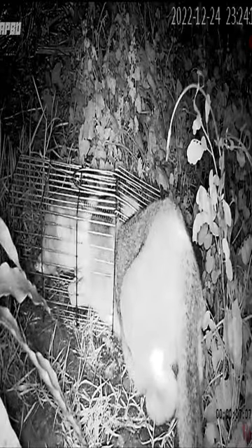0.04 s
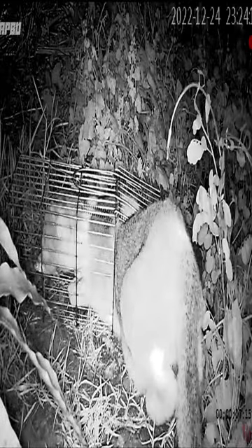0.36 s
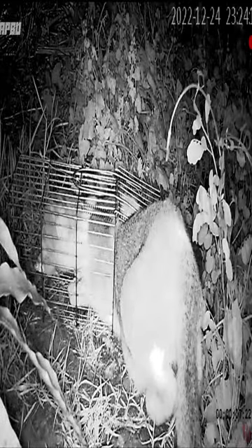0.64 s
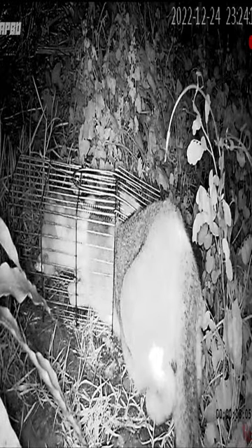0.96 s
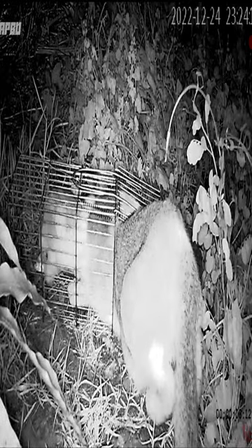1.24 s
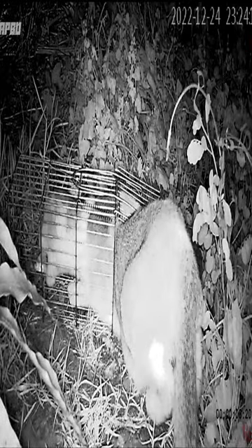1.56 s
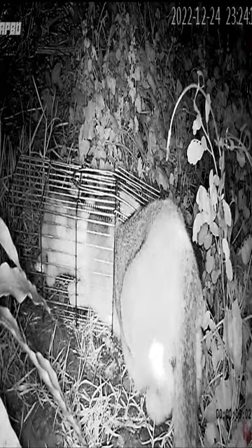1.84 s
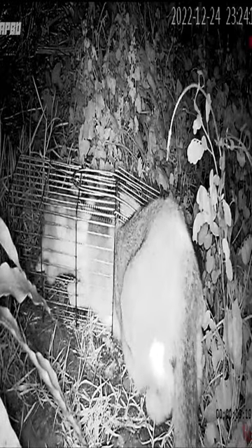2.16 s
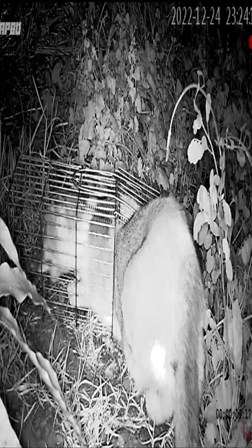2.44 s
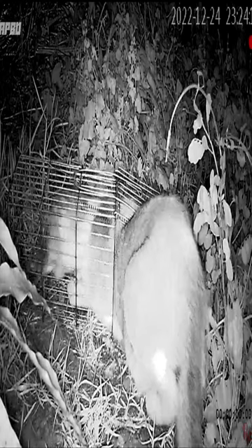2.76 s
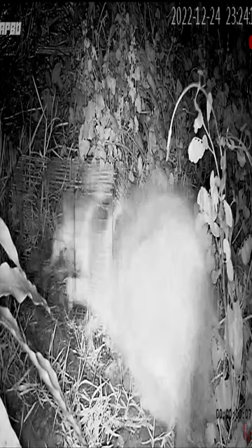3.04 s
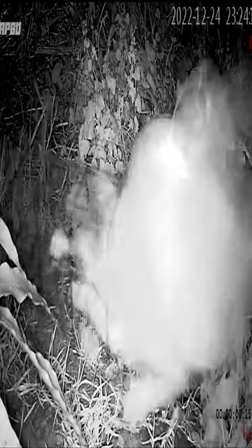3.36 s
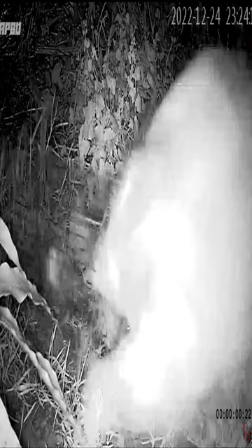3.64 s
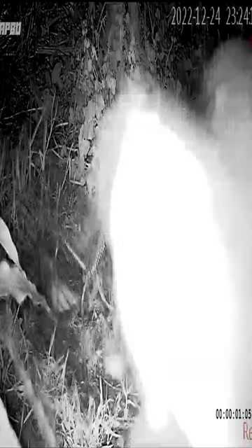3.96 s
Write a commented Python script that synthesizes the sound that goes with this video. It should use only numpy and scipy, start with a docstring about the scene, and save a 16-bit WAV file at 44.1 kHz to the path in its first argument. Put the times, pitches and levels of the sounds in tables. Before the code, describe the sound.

Small frogs trill outdoors at night in swelling runs, one answering another, while a third ticks steadily. Crickets chirp above them over a distant insect haze, and dry grass stirs very faintly near the end.

```python
"""Two froglets trill outdoors at night, in swelling runs of notes, each note a few quick pulses.
A third frog ticks on and on, and far frogs whistle. Crickets and bush-crickets chirp above them
by scraping their wings, over a haze of distant callers. An animal stirs faintly in the dry grass
near the end; the recorder adds hiss and a slow low throb."""
import sys
import numpy as np
from scipy import signal
from scipy.fft import rfft, irfft
from scipy.io import wavfile
from scipy.ndimage import map_coordinates

SR = 44100
rng = np.random.default_rng(int(sys.argv[2]) if len(sys.argv) > 2 else 0)


def master_out(mix):
    """Clip the mix to full scale and print it as 16-bit PCM to the path in sys.argv[1]."""
    frames = np.transpose(np.atleast_2d(mix))
    ceiling = np.clip(frames, -1, 1)
    pcm = np.round(ceiling * 32767).astype(np.int16)
    wavfile.write(sys.argv[1], SR, pcm)


N = 176400


def undb(db):
    """Turn decibels into a gain to multiply by."""
    return 10 ** (np.asarray(db) / 20)


def clock(length):
    """The time of each sample over a length in seconds."""
    return np.arange(int(length * SR)) / SR


def add(out, start, x):
    """Mix x into out from a start time in seconds."""
    i = int(round(start * SR))
    first, last = max(i, 0), min(i + len(x), N)
    if last > first:
        out[first:last] += x[first - i:last - i]


def curve(rows):
    """A gain that follows (time [s], level [dB]) points."""
    return undb(np.interp(np.arange(N) / SR, *np.array(rows).T))


def sine(hz):
    """A pure tone that follows a moving pitch."""
    return np.sin(2 * np.pi * np.cumsum(hz) / SR)


def gate(t, length, fade_s):
    """Fade in, hold, then fade out."""
    return np.clip(np.minimum(t, length - t) / fade_s, 0, 1)


def noise(shape):
    """Noise of strength 1; shape(Hz) says how much of each frequency it holds."""
    hz = np.arange(N // 2 + 1) * SR / N
    x = irfft(rfft(rng.standard_normal(N)) * shape(hz), N)
    return x / x.std()


def band(hz, width_hz):
    """Noise around one pitch; around 0 Hz it is a random wobble."""
    return noise(lambda f: (1 + ((f - hz) / width_hz) ** 2) ** -2)


def wide(make, likeness):
    """Left and right channels that share part of their sound (likeness 0 to 1)."""
    return np.sqrt(likeness) * make() + np.sqrt(1 - likeness) * np.array([make(), make()])


def place(x, pan_db, echo_db, echo_s):
    """A caller among plants: its direct sound plus a scattered echo. Positive pan is to the left."""
    u, t = clock(.5), np.arange(N) / SR
    tail = rng.standard_normal((2, len(u))) * np.exp(-np.log(1000) * u / echo_s) * (u > .002)
    tail /= np.sqrt((tail ** 2).sum(axis=1, keepdims=True))
    echo = undb(echo_db) * signal.fftconvolve(x[None], tail, axes=1)[:, :N]
    left_lead_s = np.tanh(pan_db / 2) * .000028  # sound from the right reaches the left side later
    left = map_coordinates(x, [(t + left_lead_s) * SR], mode="mirror")
    return (np.array([left, x]) + echo) * undb(np.array([[pan_db], [-pan_db]]) / 2)


def distant_chorus():
    """Far callers merge into fluttering bands of noise over the still air."""
    # still air, far chorus and hiss: (frequency [Hz], relative level [dB])
    air = [(25,14),(100,8.5),(300,3.5),(800,-1),(2000,-3),(2700,4.5),(3600,9),(4500,3.5),(5600,2),(6600,-2),(7600,-14.5),(9500,-6),(12000,-9.5),(15500,-21)]
    # bands of distant callers: (pitch [Hz], width [Hz], level [dB], flutter [dB])
    haze = [(2440,182,-70.5,3),(2995,320,-60,2),(5175,55,-70,3),(5330,120,-71,2.5),(4290,14,-80,3.5),(6590,70,-75,2),(9395,65,-74.5,2.5),(8720,180,-73.5,2.5)]
    # how loud the distant crickets are: (time [s], relative level [dB])
    crowd = [(0.0, -62), (0.79, -62), (1.1, -72), (1.37, -61), (1.5, -66), (1.57, -64), (1.67, -68),
             (1.69, -77), (1.89, -61), (2.23, -65), (2.25, -67.5), (2.75, -62), (2.91, -72), (3.14, -58.5),
             (3.42, -65), (3.44, -67), (3.91, -56.5), (4.0, -58)]
    air_hz, air_db = np.array(air).T
    air_shape = lambda f: undb(np.interp(np.log(f + 1), np.log(air_hz), air_db))
    out = undb(-57) * wide(lambda: noise(air_shape), likeness=.38)
    for hz, width, db, flutter_db in haze:
        out += undb(db + flutter_db * band(0, 40)) * wide(lambda: band(hz, width), likeness=.38)
    flutter = undb(.5 + 2 * band(0, 76))
    return out + flutter * curve(crowd) * wide(lambda: band(6294, 430), likeness=.17)


def low_crickets():
    """Two crickets chirp in wing strokes that fall in pitch, blurred by the undergrowth."""
    # chirps: (start [s], length [s], pitch [Hz], relative level [dB])
    chirps = [(-.03,.08,5030,-52.5),(0.061,.08,5090,-47),(0.087,.085,4950,-46.5),(0.209,.11,5130,-50),(.26,.085,4980,-44),(.37,.1,5140,-48),(.42,.08,5000,-45.5),(0.539,.11,5080,-49),(0.591,.08,4970,-44.5),(0.709,.1,5076,-47.5),(0.746,.08,5010,-45),(.87,.11,5120,-49),(0.922,.085,4980,-44.5),(1.087,.085,4970,-45),(1.263,.08,4980,-45)]
    stroke_s, fall_hz = .0135, 90
    out, t = np.zeros(N), clock(stroke_s)
    for at, length, hz, db in chirps:
        for lag in np.arange(0, length - stroke_s / 2, stroke_s):
            tone = sine(hz + 28 * rng.standard_normal() - fall_hz * (t / t[-1] - .5))
            add(out, at + lag, undb(db - 2) * gate(t, t[-1], fade_s=.0028) * tone)
    return place(out, pan_db=-2.5, echo_db=-3, echo_s=.33)


def scrapes(strokes, hz, rise_hz, grain_hz, rough):
    """Strokes of a wing's tiny file: a rising tone broken up by uneven teeth."""
    out, teeth = np.zeros(N), noise(lambda f: 1 / (1 + (f / grain_hz) ** 6))
    for at, length, db in strokes:
        t = clock(length)
        tone = sine(hz + rise_hz * (t / length - .5))
        add(out, at, undb(db) * gate(t, length, fade_s=.021) * tone)
    return out * (1 + rough * teeth) * np.sqrt(2 / (1 + rough ** 2))


def lisping_bush_cricket():
    """A far bush-cricket scrapes its wings in short, soft lisps."""
    # lisps: (start [s])
    starts = [.02,.12,.22,0.321,.41,.49,.62,.73,.83,0.939,1.06,1.179,1.25,1.38,1.499,1.66,1.79,1.87,1.96,2.08,2.191,2.32,2.501,2.6,2.721,2.86,2.939,3.08,3.2,3.36,3.48,3.66,3.759,3.93]
    length_s, db = .069, -69
    lisps = scrapes([(at, length_s, db) for at in starts], hz=8610, rise_hz=394, grain_hz=174, rough=2.2)
    return place(lisps, pan_db=-1, echo_db=2.5, echo_s=.22)


def trill(notes, pulses, hz, effort_hz, jitter):
    """Each frog note is a few quick sliding pulses; louder notes are a little higher."""
    decay_s, octave_db = .0098, -26
    out, loudest_db = np.zeros(N), max(db for _, db in notes)
    for at, db in notes:
        note_hz = hz + effort_hz * undb(db - loudest_db)
        for lead, length, ratio, fall, pulse_db in pulses:
            t = clock(length)
            pulse_hz = note_hz * ratio * (1 + jitter * rng.standard_normal())
            glide = pulse_hz * (1 - fall * (t / length - .5))
            tone = sine(glide) + undb(octave_db) * sine(2 * glide)
            loudness = gate(t, length, fade_s=.00112) * np.exp(-t / decay_s)
            add(out, at - lead, undb(db + pulse_db) * loudness * tone)
    return out


def near_froglet():
    """The near froglet calls two runs of pulsed notes that grow louder."""
    # notes: (time [s], relative level [dB])
    notes = [(.038,-42.5),(.081,-43),(.123,-43.5),(.167,-41.5),(.208,-42),(.251,-43.5),(.295,-41),(.338,-42),(.381,-38.5),(.423,-36),(.465,-35),(.508,-34),(.556,-32.5),(.614,-33),
             (2.637,-56),(2.677,-50),(2.722,-54),(2.765,-53),(2.808,-49),(2.851,-49),(2.897,-49.5),(2.94,-48),(2.986,-48.5),(3.027,-47),(3.071,-46),(3.114,-46),(3.159,-46),(3.202,-46),(3.245,-45.5),(3.29,-44.5),(3.333,-45.5),(3.377,-46),(3.423,-44),(3.467,-43.5),(3.511,-43.5),(3.554,-42.5),(3.599,-42.5),(3.643,-41.5),(3.687,-42),(3.732,-40),(3.776,-39),(3.821,-39),(3.866,-37),(3.91,-35.5),(3.957,-33.5),(4.004,-35)]
    # pulses of a note; a negative fall is a rise:
    # (head start [s], length [s], pitch [ratio], pitch fall [share], relative level [dB])
    pulses = [(.0145,.006,1.095,-0.12,-8.5),(.0081,.0062,1.068,-.07,-2.5),(.0018,.0108,1.003,.025,-.5)]
    call = undb(5.3) * trill(notes, pulses, hz=3102, effort_hz=148, jitter=.0084)
    return place(call, pan_db=-1.8, echo_db=-8.5, echo_s=.2)


def ticking_frog():
    """A third frog makes sharp ticks that drop onto one pitch and ring briefly."""
    # ticks: (time [s])
    ticks = [.09,0.124,0.167,0.236,.268,.3,.333,.362,0.393,.43,.465,0.498,.647,.673,.705,.735,0.767,.799,.839,.935,.96,.989,1.022,1.055,1.086,1.119,1.156,1.195,1.251,1.327,1.362,1.396,1.427,1.456,1.486,1.526,1.6,1.629,1.661,1.693,1.725,1.757,1.791,1.826,1.909,1.947,1.977,2.01,2.039,2.072,2.105,2.142,2.23,2.257,2.29,2.323,2.356,2.391,2.425,2.456,2.536,2.583,2.613,2.643,2.674,2.708,2.746,2.794,2.845,2.882,2.917,2.952,2.985,3.02,3.053,3.088,3.185,3.205,3.237,3.273,3.303,3.332,3.364,3.403,3.436,3.523,3.583,3.62,3.652,3.683,3.719,3.756,3.794,3.93,3.963,3.992]
    ring_hz, drop_hz, decay_s, lead_s = 2744, 480, .0055, .002313
    out, t = np.zeros(N), clock(.022)
    loudness = gate(t, .02, fade_s=.0009) * np.exp(-t / decay_s)
    for at in ticks:
        tone = sine(rng.normal(ring_hz, 15) + drop_hz * np.exp(-t / .0014))
        add(out, at - lead_s, undb(rng.normal(-41.5, .59)) * loudness * tone)
    return place(out, pan_db=0, echo_db=-13.5, echo_s=.18)


def whistling_frogs():
    """Far frogs give soft whistles that rise and fall in pitch."""
    # whistles: (start [s], top pitch [Hz], level [dB])
    whistles = [(.14,2310,-60.5),(.362,2328,-52.5),(1.06,2230,-62),(1.46,2430,-62),(1.54,2350,-64),(1.64,2480,-63),(1.97,2350,-58),(2.46,2433,-57),(2.74,2340,-67),(2.93,2500,-62),(3.402,2320,-53),(3.93,2310,-62)]
    length_s, arch_hz = .081, 94
    out, t = np.zeros(N), clock(length_s)
    for at, hz, db in whistles:
        tone = sine(hz - arch_hz * (2 * t / length_s - 1) ** 2)
        add(out, at, undb(db) * gate(t, length_s, fade_s=.027) * tone)
    return place(out, pan_db=-.5, echo_db=-8, echo_s=.35)


def rasping_bush_cricket():
    """A bush-cricket scrapes out very high, rough rasps with a fainter fizz around them."""
    # rasps: (start [s], length [s], level [dB])
    rasps = [(.485,.12,-63),(.65,0.12,-61),(.82,0.15,-61.5),(1.015,.155,-61.5),(1.21,0.15,-61.5)]
    hz, rise_hz = 11470, 444
    core = scrapes(rasps, hz, rise_hz, grain_hz=277, rough=6)
    fizz = undb(-12) * scrapes(rasps, hz, rise_hz, grain_hz=1500, rough=6)
    return place(core + fizz, pan_db=2, echo_db=2.5, echo_s=.42)


def answering_froglet():
    """A froglet farther off answers with one higher run of pulsed notes."""
    # notes: (time [s], relative level [dB])
    notes = [(.65,-52),(.697,-52),(.746,-49),(.796,-47),(.843,-46),(.895,-46),(.942,-44.5),(.991,-44),(1.04,-43),(1.089,-43),(1.138,-43.5),(1.187,-43.5),(1.235,-42),(1.286,-43.5),(1.334,-42),(1.381,-42.5),(1.433,-42.5),(1.493,-42),(1.55,-44),(1.606,-43)]
    # pulses of a note: (head start [s], length [s], pitch [ratio], pitch fall [share], relative level [dB])
    pulses = [(.015,0.0042,1.03,-.12,-6),(.009,0.0051,1.025,-.11,-1),(.0035,.0145,1,.02,0)]
    call = undb(2) * trill(notes, pulses, hz=3462, effort_hz=22, jitter=.005)
    return place(call, pan_db=-4, echo_db=-3, echo_s=.096)


def animal_in_grass():
    """An animal brushes the dry grass with a faint hiss and snaps two stalks."""
    # how loud the brushing is: (time [s], relative level [dB])
    rustle = [(1.5, -72), (2.31, -74), (3.18, -71), (3.2, -67), (3.99, -64.5), (4.0, -65)]
    # snapping stalks: (time [s], pitch [Hz], width [Hz], level [dB])
    snaps = [(2.815,10000,1500,-68),(3.308,1700,1400,-63)]
    t = np.arange(N) / SR
    fade_in = np.clip((t - 1.2) / .34, 0, 1)
    flutter = undb(.5 + 1.2 * band(0, 60))
    out = flutter * curve(rustle) * fade_in * wide(lambda: band(11800, 4200), likeness=.17)
    for at, hz, width, db in snaps:
        burst = np.clip((t - at) / .004, 0, 1) * np.exp(-abs(t - at) / .023)
        out += undb(db) * burst * band(hz, width)
    return out


def swelling_cricket():
    """A cricket on the right: each chirp swells, and each wing stroke sags in pitch at its end."""
    # chirps: (last stroke [s], length [s], relative level [dB])
    chirps = [(1.672,0.18,-48),(2.232,0.22,-48),(2.822,0.23,-47),(3.425,0.23,-47.5),(4.027,0.25,-48)]
    hz, sag_hz, spacing_s, swell_s = 6150, 420, .0158, .06
    out, t = np.zeros(N), clock(.0115)
    for end, length, db in chirps:
        for before_end in np.arange(t[-1], length, spacing_s):
            tone = sine(rng.normal(hz, 30) - sag_hz * (t / t[-1]) ** 4)
            swell = min((length - before_end) / swell_s, 1)
            add(out, end - before_end, undb(db - 6) * swell * gate(t, t[-1], fade_s=.0041) * tone)
    return place(out, pan_db=-16, echo_db=-12, echo_s=.15)


def scene():
    """Frogs, insects and the stirring grass over the distant chorus."""
    frogs = near_froglet() + ticking_frog() + whistling_frogs() + answering_froglet()
    insects = low_crickets() + lisping_bush_cricket() + rasping_bush_cricket() + swelling_cricket()
    return distant_chorus() + frogs + insects + animal_in_grass()


def record(dry):
    """A regular low throb enters the recorder, and the highest treble is cut."""
    first_s, spacing_s, width_s, top_hz = .2124, .939, .033, 15700
    t = np.arange(N) / SR
    beats = np.arange(first_s, N / SR + width_s, spacing_s)
    bumps = sum(np.exp(-.5 * ((t - at) / width_s) ** 2) for at in beats)
    low_cut = signal.butter(2, 5.2, "high", fs=SR, output="sos")
    throb = -undb(-33) * signal.sosfilt(low_cut, bumps)
    treble_cut = signal.ellip(10, .2, 70, top_hz, fs=SR, output="sos")
    return signal.sosfilt(treble_cut, dry + throb)


dry = scene()
out = record(dry)
master_out(out)
```